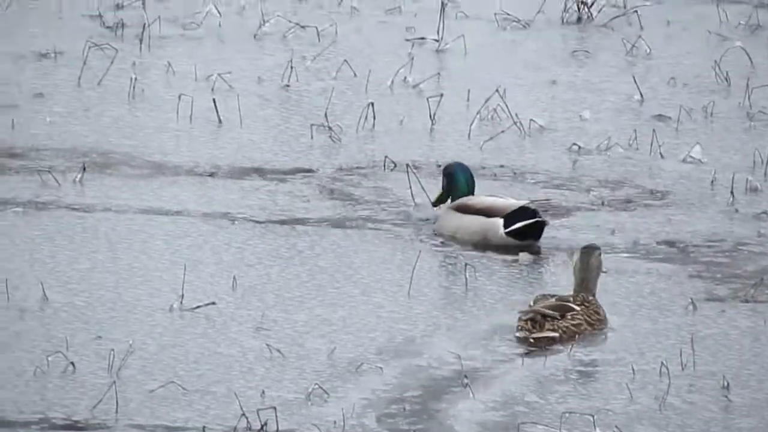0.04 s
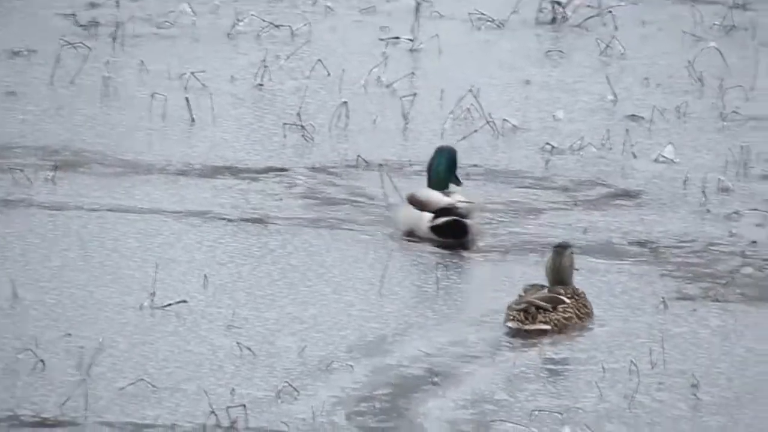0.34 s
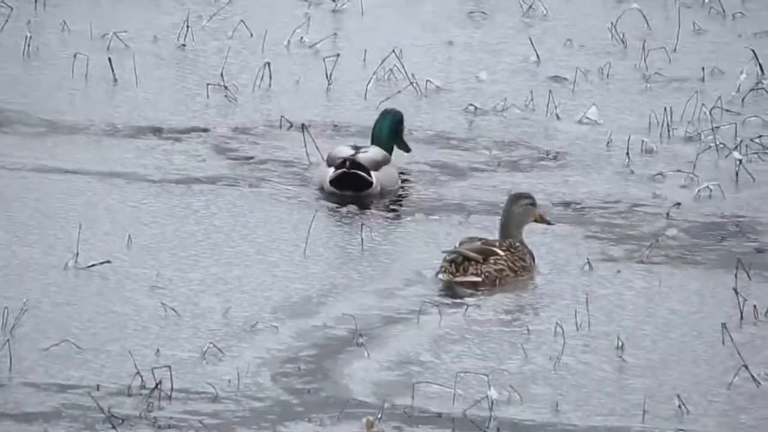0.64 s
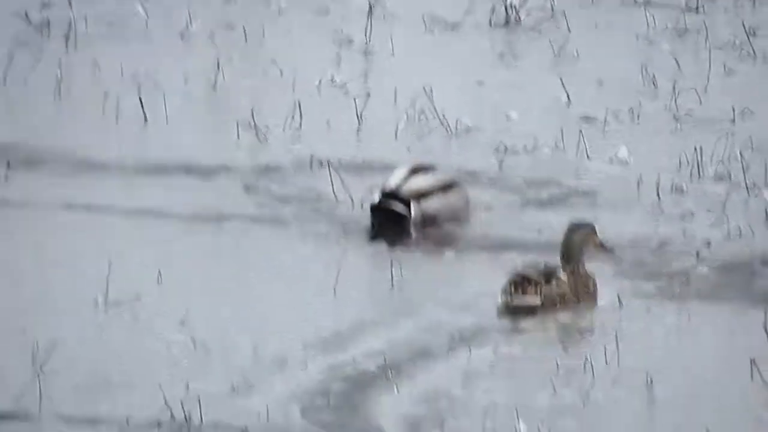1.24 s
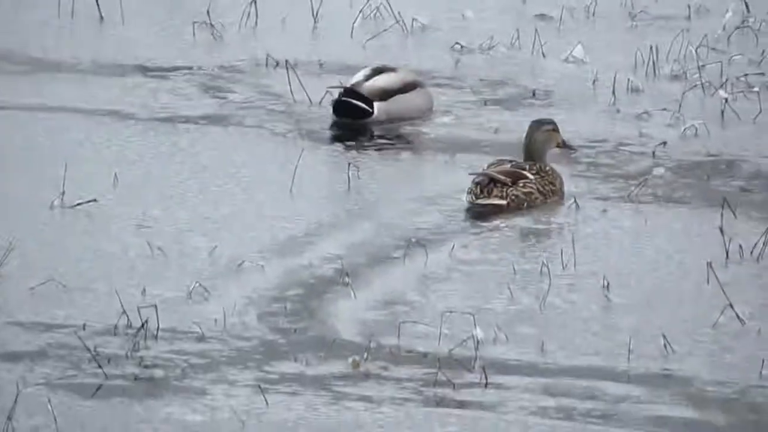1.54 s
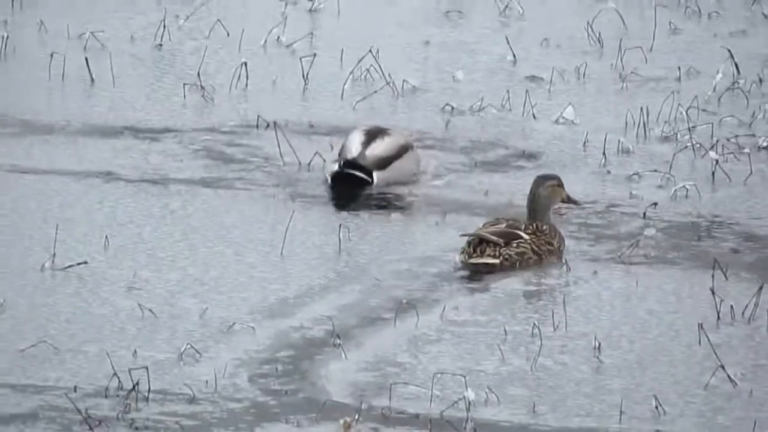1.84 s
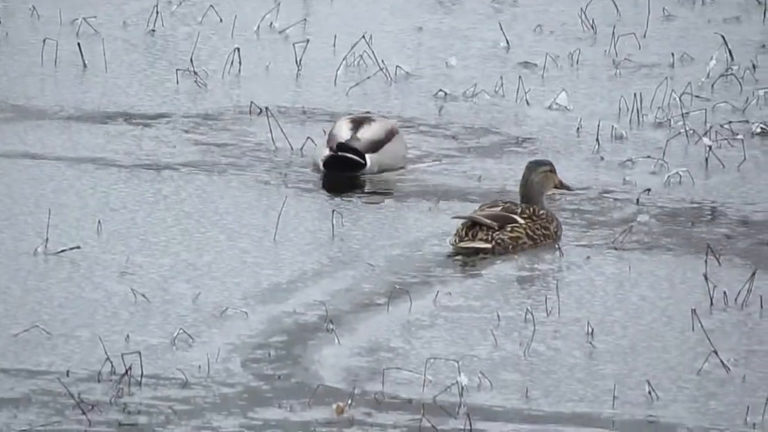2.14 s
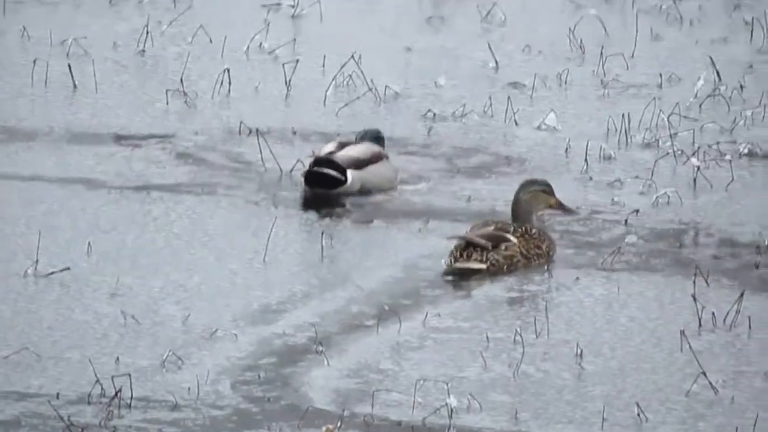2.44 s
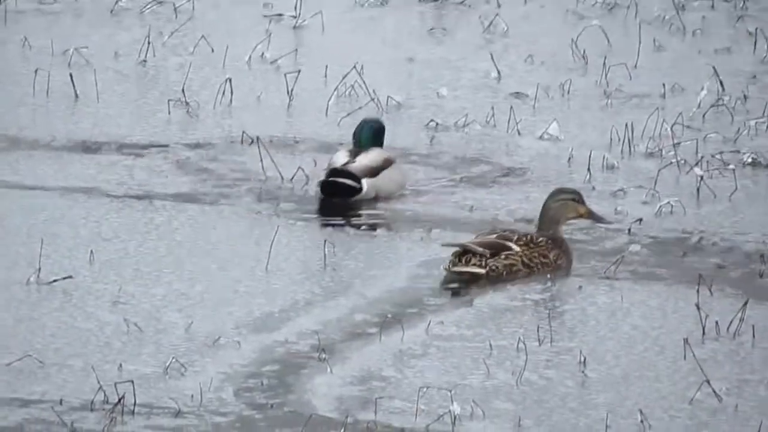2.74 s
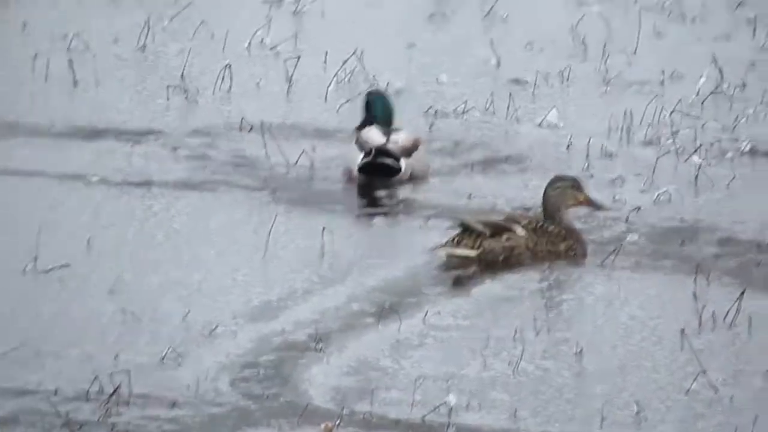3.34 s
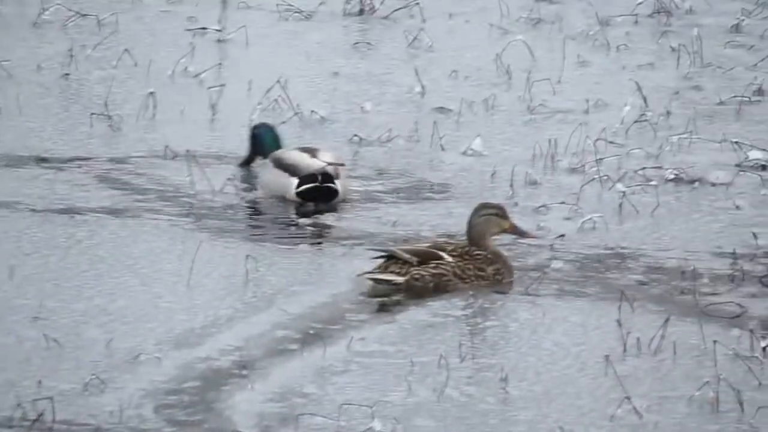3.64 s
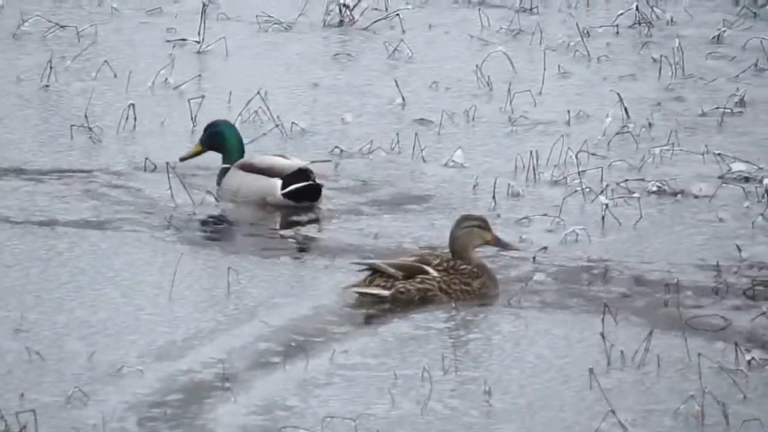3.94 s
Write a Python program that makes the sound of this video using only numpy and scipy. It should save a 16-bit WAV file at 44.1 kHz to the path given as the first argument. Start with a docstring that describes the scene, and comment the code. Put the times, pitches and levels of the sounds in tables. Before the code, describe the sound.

Scattered sleet pellets tap on thin ice and shallow water outdoors, a few clicking sharply against the microphone. Low wind thumps open the scene, ease to a faint hiss, and come back as the pattering thickens.

```python
"""Wind thumps on the microphone while sleet pats on the ice and water of a slushy pond all around.
Each pellet gives the surface a soft push that dies away at once; a few hit the microphone's housing
and make it ring with a sharp tick. Thin ice crackles, and bubbles or struck ice give short plinks.
Gusts push and pull on the microphone's two openings (its ports); behind it all lies a faint hiss."""
import sys
import numpy as np
from scipy import signal
from scipy.fft import rfft, irfft
from scipy.io import wavfile

SR = 44100
rng = np.random.default_rng(int(sys.argv[2]) if len(sys.argv) > 2 else 0)


def generate_wav(signal):
    """Clip the signal to [-1, 1] and save it as 16-bit WAV at the path in sys.argv[1]."""
    frames = np.transpose(np.atleast_2d(signal))
    scaled = np.clip(frames, -1, 1) * 32767
    pcm = np.round(scaled).astype(np.int16)
    wavfile.write(sys.argv[1], SR, pcm)


N = 176400
TIME = np.arange(N) / SR
HIT_TIME = np.arange(2048) / SR   # the clock of one short hit, in seconds
CUTOFF_HZ = 16200   # upper edge of the treble

# how the hiss rises and falls; the far sleet follows it too: t/s, level/dB
HISS_LEVELS = [(0, -56), (.3, -56.5), (.8, -58.5), (.9, -60), (1.2, -56.5), (1.31, -58), (1.35, -65),
               (1.65, -60), (2.2, -57), (2.68, -55), (2.88, -53), (3.12, -53.5), (3.3, -55), (3.5, -55),
               (4, -53)]


def near_sleet():
    """Pellets pat on the ice and slush close by."""
    # one pat a row: t/s, level/dB, f/Hz, Q (higher rings longer), left minus right/dB, snap level/dB
    pats = [(0.0705, -37, 7470, 1.8, 8, -55), (0.0955, -29, 670, 2.4, 5, -51),
            (0.1905, -38, 1030, 0.5, 7, -58), (0.2629, -31, 1720, 1.9, -8, -58),
            (0.2789, -37, 6530, 0.8, -1, -57), (0.3071, -27, 1470, 1.0, -8, -49),
            (0.3123, -24, 1470, 0.9, 8, -43), (0.3721, -38, 2920, 1.3, 6, -57),
            (0.4383, -26, 1720, 0.5, 6, -36), (0.4411, -34, 3230, 2.7, -7, -42),
            (0.519, -37, 1240, 1.8, 8, -46), (0.651, -39, 940, 0.6, 6, -56),
            (0.6769, -28, 3820, 0.9, -5, -37), (0.8401, -32, 1290, 0.5, -6, -58),
            (0.967, -30, 930, 0.5, 5, -50), (0.9913, -36, 3120, 0.9, -3, -44),
            (0.9949, -39, 1760, 3.6, 4, -58), (1.0275, -38, 3120, 2.4, 10, -58),
            (1.1035, -37, 1210, 0.5, -3, -58), (1.1943, -36, 1780, 0.5, 8, -58),
            (1.2215, -40, 3410, 8.2, -7, -54), (1.2282, -42, 5870, 1.3, -3, -41),
            (1.4445, -44, 1280, 1.0, -7, -58), (1.4605, -36, 980, 1.0, 8, -58),
            (1.5092, -33, 3540, 0.5, 10, -58), (1.601, -43, 1520, 1.4, -10, -56),
            (2.0218, -23, 1030, 1.8, -5, -57), (2.0398, -36, 8390, 0.9, 6, -54),
            (2.1986, -30, 3560, 0.7, -6, -58), (2.2256, -43, 5920, 1.7, -3, -58),
            (2.3267, -39, 8790, 8.2, 6, -40), (2.3602, -30, 1850, 1.7, 8, -36),
            (2.375, -23, 1520, 2.2, 6, -43), (2.6573, -29, 4760, 0.7, -2, -47),
            (2.684, -33, 3870, 1.2, -5, -47), (2.6952, -33, 970, 1.2, 6, -48),
            (2.8827, -32, 3920, 0.5, -3, -54), (2.9735, -39, 1590, 0.5, -5, -58),
            (3.029, -39, 7030, 1.4, 7, -58), (3.0373, -32, 3640, 3.3, -6, -35),
            (3.0756, -41, 8710, 8.2, -3, -40), (3.2625, -40, 1020, 1.3, 9, -58),
            (3.2988, -39, 1640, 1.6, 7, -45), (3.3516, -43, 7870, 1.3, 6, -47),
            (3.4772, -23, 1860, 0.6, 9, -57), (3.5361, -24, 710, 1.4, -8, -39),
            (3.7098, -38, 7780, 0.7, 7, -54), (3.7147, -34, 2510, 8.2, -11, -46),
            (3.7436, -27, 4440, 0.7, -2, -53), (3.8093, -25, 4660, 1.6, 11, -27),
            (3.8385, -25, 1240, 1.1, -5, -58), (3.8489, -19, 2350, 0.5, 11, -53),
            (3.8819, -26, 1250, 1.7, 7, -48), (3.8941, -37, 1260, 0.5, -8, -58),
            (3.8982, -41, 4440, 1.7, 8, -43), (3.929, -28, 1480, 2.8, -7, -51),
            (3.9331, -27, 1670, 1.7, 7, -41), (3.9411, -35, 2440, 1.9, 6, -51),
            (3.9822, -37, 9830, 3.2, -1, -36)]
    return from_db(-.3) * pellets(pats)


def pellets(rows):
    """Each pellet and its crumbs push on a surface that barely rings; brittle ice adds a bright snap."""
    crumbs_db, crumbs_fade_s, lag_s_per_db = -28, .016, .000018
    out = np.zeros((2, N))
    click = 1. * (HIT_TIME == 0)
    snap = cut(click, 7000, "high")
    for s, db, hz, q, pan_db, snap_db in rows:
        crumbs = rng.standard_normal((2, len(HIT_TIME))) * from_db(crumbs_db) * decay(crumbs_fade_s)
        push = cut(crumbs + click, 3.4 * hz, "low")   # a soft landing has little treble
        push = cut(push, .3 * hz, "high")
        angle = 2 * np.pi * min(hz, CUTOFF_HZ) / SR
        damping = np.sin(angle) / (2 * q)
        ring = signal.lfilter([1, 0, -1], [1 + damping, -2 * np.cos(angle), 1 - damping], push)
        ports = from_db([[pan_db / 2], [-pan_db / 2]])
        pat = at_level(ring * ports, db) + at_level(snap * ports, snap_db)
        for side, sign in enumerate((-1, 1)):   # the nearer port hears it first
            add(out[side], s + sign * pan_db * lag_s_per_db, pat[side])
    return out


def housing_ticks():
    """A hard pellet cracks on the housing, shoves it and sets it ringing for a few milliseconds."""
    # one strike a row: t/s, level/dB, treble cut f/Hz, bass cut f/Hz, pitch factor, ring length factor
    strikes = [(0.8344, 2.5, 15000, 3400, .96, .85), (1.3258, 5, 14000, 3300, 1.01, .95),
               (1.6157, -6.5, 1900, 700, .97, 1.8), (3.1968, -3.5, 15000, 6500, 1.02, 1.05),
               (3.9906, 5, 13000, 3400, .99, .9)]
    # the tones the housing rings with: f/Hz, left level/dB, right level/dB, time to fade by 60 dB/s
    tones = [(1500, -32, -32, .008), (2280, -21, -24, .010), (2880, -26, -22, .010), (3750, -21, -25, .007),
             (4900, -14, -9, .0045), (5600, -17, -8, .0035), (6550, -14, -5, .0035), (7450, -5, -1, .0035),
             (9000, -3, -4, .004), (10400, -8, -11, .004), (12300, -4, -7, .0035), (14900, -4, -8, .004)]
    right_lag_s, rocking_below_hz = .000019, 4100
    out = np.zeros((2, N))
    since = np.maximum(HIT_TIME - np.array([[0], [right_lag_s]]), 0)
    thud = from_db(-25) * decay(.005)
    crack_fade = from_db(-10.5) * decay(.0026) + from_db(-39) * decay(.016)   # a burst, then a faint tail
    for s, db, treble_cut_hz, bass_cut_hz, pitch, length in strikes:
        ring = np.zeros_like(since)
        for k, (hz, left_db, right_db, fade_s) in enumerate(tones):
            # low tones rock the housing, so the two ports move opposite ways
            ports = from_db([[left_db], [right_db]]) * [[1], [np.sign(hz - rocking_below_hz)]]
            tone = np.sin(2 * np.pi * hz * pitch * rng.uniform(.98, 1.02) * since)
            ring += (-1) ** k * ports * tone * decay(fade_s * length)
        crack = rng.standard_normal(ring.shape) * crack_fade
        softened = cut(ring + crack, treble_cut_hz, "low")
        tick = from_db(db) * (cut(softened, bass_cut_hz, "high", order=2) + thud)
        for side in range(2):
            add(out[side], s, tick[side])
    return out


def wind():
    """Lumpy gusts and single swirls of air push on one port while they pull on the other."""
    # strength of the wind at the ports: t/s, level/dB
    gusts = [(0, -21), (.09, -13), (.17, -16.5), (.21, -22), (.29, -25), (.34, -16), (.4, -13.5),
             (.45, -20), (.49, -17), (.55, -21), (.63, -23), (.74, -41), (.92, -48), (1.0, -33),
             (1.11, -28), (1.18, -28), (1.31, -26.5), (1.4, -35), (1.49, -60), (1.68, -51), (1.75, -37),
             (1.89, -49), (1.96, -36), (2.06, -45), (2.28, -36), (2.45, -39), (2.72, -54), (3.02, -47),
             (3.2, -55), (3.53, -48), (3.575, -21.5), (3.63, -31), (3.75, -39), (3.8, -30), (3.89, -32),
             (3.96, -22)]
    # the deep tone colour of rough air: f/Hz, level/dB
    spectrum = [(20, -13), (35, -2), (65, 5), (110, 3.5), (180, 1.5), (280, -5), (400, -14), (550, -24),
                (750, -39), (1200, -54), (2500, -68)]
    # single swirls that thump the ports: t/s, level/dB, f/Hz
    swirls = [(.044, -3, 190), (.08, -1, 190), (.096, 1, 220), (.126, -6, 220), (.141, -3, 150),
              (.184, -4, 210), (.232, -6, 190), (.336, -6, 150), (.378, -8, 150), (.392, 2, 190),
              (.399, -3, 130), (.424, -2, 190), (.451, -9, 200), (.488, -2, 230), (.516, -8, 230),
              (.564, -9, 170), (.632, -12, 220), (.774, -6, 125), (.833, -16, 230), (1.064, -15, 190),
              (1.103, -7, 215), (1.125, -12, 170), (1.176, -12, 170), (1.2675, 4, 165), (1.295, -5, 220),
              (1.313, -13, 170), (1.356, -17, 190), (1.737, -22, 130), (1.832, -19, 85), (3.023, -18, 85),
              (3.577, -6, 115), (3.607, -13, 210), (3.7, -16, 160), (3.962, -13, 150), (3.986, -7, 120)]
    lump_db, bright_above_hz, brightening, swirl_width_cycles = 4.5, 330, .15, .255
    lumps = from_db(lump_db * np.clip(drift(per_s=45), -2, 2))
    flow = level_at(gusts, TIME) * rms_one(lumps)
    rough_air = noise(spectrum, channels=1)[0]
    bass = cut(rough_air, bright_above_hz, "low", order=2)
    bass = cut(bass[::-1], bright_above_hz, "low", order=2)[::-1]   # a backward pass undoes the delay
    # stronger flow makes finer swirls, which sound brighter
    treble = (rough_air - bass) * (flow / flow.mean()) ** brightening
    pressure = flow * (bass + treble)
    for s, db, hz in swirls:
        cycles = np.clip(hz * (TIME - s), -10, 10)
        pressure += from_db(db) * np.sin(2 * np.pi * cycles) / np.cosh(cycles / swirl_width_cycles)
    ports = np.array([[1], [-from_db(-6.3)]])
    own_swirls = from_db(-21) * flow * noise(spectrum, channels=2)   # each port also has its own
    return pressure * ports + own_swirls


def ice_crackle():
    """Thin ice crackles in short runs of tiny bright ticks at uneven gaps."""
    # one run a row: t/s, length/s, tick level/dB
    runs = [(.122, .027, -43), (.232, .02, -44), (.482, .025, -44), (1.205, .028, -45), (2.378, .03, -44),
            (3.0, .012, -42), (3.128, .016, -40), (3.608, .008, -42)]
    ticks_per_s, spread_db, low_hz, high_hz, q = 170, 2.5, 3800, 14000, 1.5
    rows = []
    for start, length, run_db in runs:
        for k, (late, size, pitch, side) in enumerate(rng.random((24, 4))):
            if k < length * ticks_per_s:
                s = start + (k + late) / ticks_per_s
                db = run_db + spread_db * (2 * size - 1)
                hz = low_hz * (high_hz / low_hz) ** pitch
                pan_db = 8 * (2 * side - 1)
                rows.append((s, db, hz, q, pan_db, -np.inf))   # -inf: no snap
    return pellets(rows)


def plinks_and_plops():
    """Short plinks and plops: bubbles in the slush, and ice ringing under a pellet."""
    # one plink a row: t/s, level/dB, f/Hz, time to fade by 60 dB/s
    plinks = [(.6771, -25, 2850, .009), (2.091, -44, 3300, .02), (3.133, -37, 4020, .026),
              (3.5365, -24, 800, .018)]
    out = np.zeros(N)
    for s, db, hz, fade_s in plinks:
        add(out, s, from_db(db) * np.sin(2 * np.pi * hz * HIT_TIME) * decay(fade_s))
    return out


def far_sleet():
    """Faint pellets land farther off, at random times, pitches and directions."""
    pellets_per_s, base_db, spread_db, low_hz, high_hz, q = 50, -54, 3, 1300, 14000, 3
    gap, size, pitch, side = rng.random((700, 4)).T
    s = np.cumsum(-np.log(gap)) / pellets_per_s
    hiss_swing_db = 20 * np.log10(level_at(HISS_LEVELS, s) / level_at(HISS_LEVELS, TIME).mean())
    db = base_db + spread_db * np.minimum(-np.log(size), 3) + .5 * hiss_swing_db
    hz = low_hz * (high_hz / low_hz) ** pitch
    pan_db = 8 * (2 * side - 1)
    no_snap = np.full(len(s), -np.inf)
    rows = np.column_stack([s, db, hz, np.full(len(s), q), pan_db, no_snap])
    return pellets(rows[s < N / SR])


def sizzle():
    """Fine sleet sizzles in the treble, in small grainy swells."""
    # how the sizzle rises and falls: t/s, level/dB
    levels = [(0, -62), (.9, -68), (1.25, -62), (1.35, -72), (2.2, -65.5), (2.7, -63), (2.82, -56),
              (3.14, -56), (3.35, -63), (4, -59)]
    # its bright tone colour: f/Hz, level/dB
    spectrum = [(2000, -16), (4000, -4), (7000, -1), (10500, -2), (14000, 0), (16000, 0)]
    swell_db = 2.5 * drift(per_s=18)
    grain_db = 2.5 * drift(per_s=400)
    return level_at(levels, TIME) * rms_one(noise(spectrum, channels=2) * from_db(swell_db + grain_db))


def hiss_and_far_wind():
    """A wide, lightly flickering hiss lies over the low murmur of far wind."""
    # tone colour of the hiss: f/Hz, level/dB
    hiss_spectrum = [(400, 9), (700, 11), (1300, 7), (2500, 2.5), (5000, -.3), (10000, -3.3), (15000, -3)]
    # tone colour of the far wind: f/Hz, level/dB
    murmur_spectrum = [(20, -3), (55, 4), (130, -4), (300, -9), (600, -17), (1200, -36), (3000, -60)]
    hiss = noise(hiss_spectrum + [(CUTOFF_HZ, hiss_spectrum[-1][1])], channels=2)
    flicker = from_db(1.4 * drift(per_s=150))
    murmur = from_db(7.5) * noise(murmur_spectrum, channels=2)
    return level_at(HISS_LEVELS, TIME) * (hiss * flicker + murmur)


def from_db(db):
    """Turn decibels into a number to multiply by."""
    return 10 ** (np.asarray(db) / 20)


def rms_one(x):
    """Scale a signal so its average strength (rms) is 1."""
    return x / np.sqrt(np.mean(x ** 2) + 1e-20)


def level_at(curve, s):
    """Read a curve of t/s, level/dB at time s, as a number to multiply by."""
    return from_db(np.interp(s, *np.transpose(curve)))


def at_level(hit, db):
    """Give a stereo hit the energy of one millisecond of sound at this level."""
    return hit * from_db(db) / np.sqrt(np.sum(hit ** 2) / (2 * SR / 1000))


def decay(fade_s):
    """A fade that loses 60 dB in fade_s seconds."""
    return np.exp(-np.log(1000) * HIT_TIME / fade_s)


def cut(x, hz, kind, order=1):
    """Filter a sound: "low" keeps what is below hz, "high" keeps what is above."""
    return signal.sosfilt(signal.butter(order, min(hz, .45 * SR), kind, fs=SR, output="sos"), x)


def drift(per_s):
    """A smooth random wobble of size about 1; a higher per_s makes it quicker."""
    step, warm_up = 40, 2000   # samples a step; steps thrown away while the smoothing settles
    memory = np.exp(-2 * np.pi * step * per_s / SR)
    jitter = rng.standard_normal(N // step + warm_up + 2)
    smooth = signal.lfilter([1], [1, -2 * memory, memory * memory], jitter)[warm_up:]
    return np.interp(np.arange(N) / step, np.arange(len(smooth)), rms_one(smooth))


def noise(spectrum, channels):
    """A separate noise for each channel, with the given tone colour and strength 1."""
    hz, db = np.transpose(spectrum)
    bins = np.maximum(np.fft.rfftfreq(N, 1 / SR), 1)
    gain = from_db(np.interp(np.log(bins), np.log(hz), db, right=-90))
    gain *= np.minimum(bins / hz[0], 1)   # fade out below the lowest listed pitch
    return rms_one(irfft(rfft(rng.standard_normal((channels, N))) * gain, N))


def add(out, s, sound):
    """Mix a short sound into one channel, starting at s seconds."""
    start = int(np.clip(s * SR, 0, N - 1))
    out[start:start + len(sound)] += sound[:N - start]


def scene():
    """Wind and hiss, sleet near and far, crackling ice and plinks, all added together."""
    air = wind() + hiss_and_far_wind() + sizzle()
    return air + housing_ticks() + near_sleet() + far_sleet() + ice_crackle() + plinks_and_plops()


def record(dry):
    """The loudest peaks overload the input and are rounded off; then the highest treble is cut."""
    ceiling = 1.05
    rounded = ceiling * np.tanh(dry / ceiling)
    return signal.sosfilt(signal.ellip(10, .1, 80, CUTOFF_HZ, fs=SR, output="sos"), rounded)


dry = scene()
out = record(dry)
generate_wav(out)
```